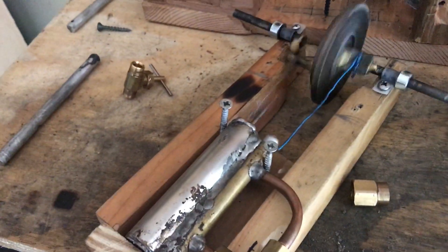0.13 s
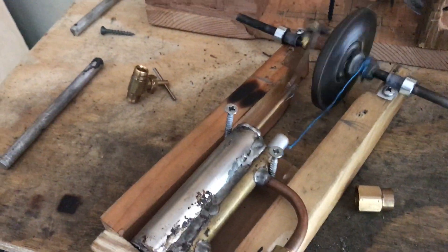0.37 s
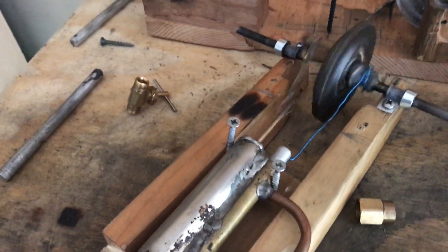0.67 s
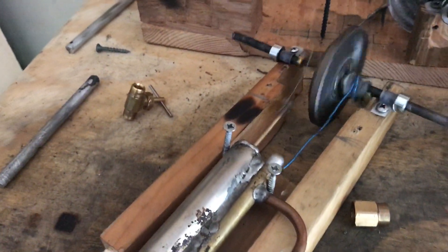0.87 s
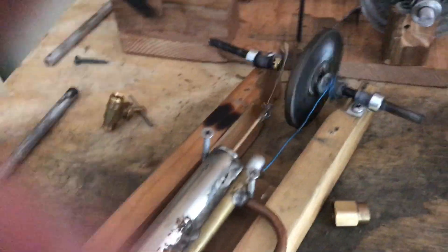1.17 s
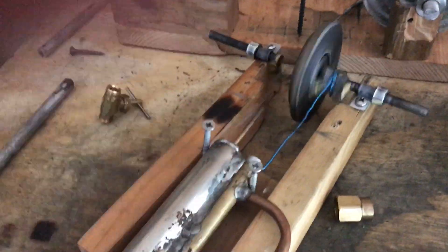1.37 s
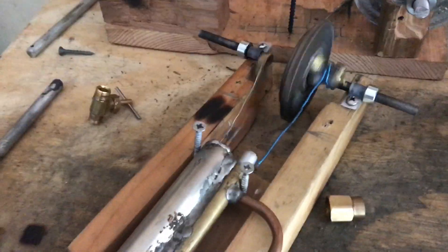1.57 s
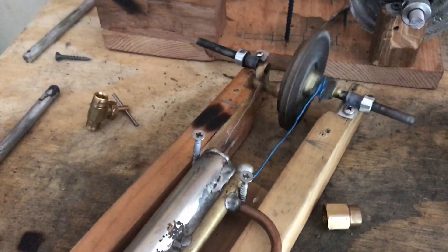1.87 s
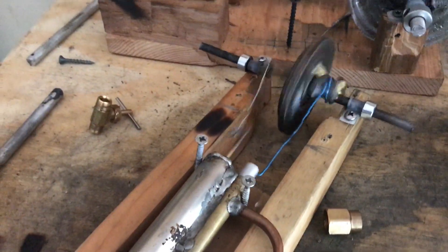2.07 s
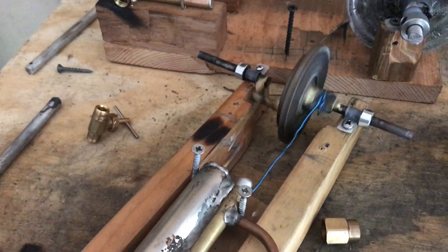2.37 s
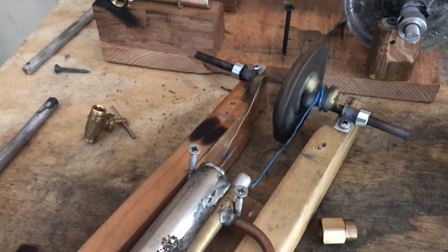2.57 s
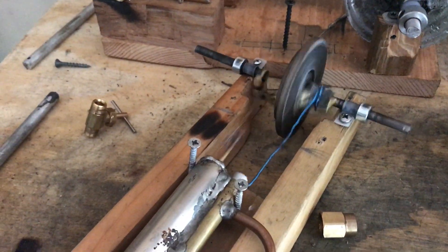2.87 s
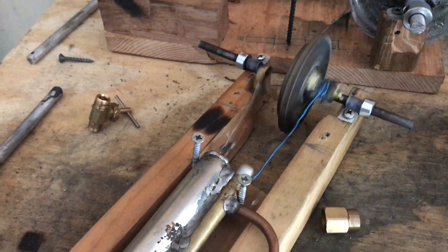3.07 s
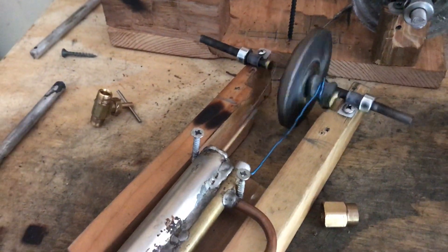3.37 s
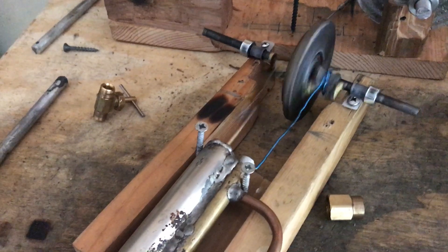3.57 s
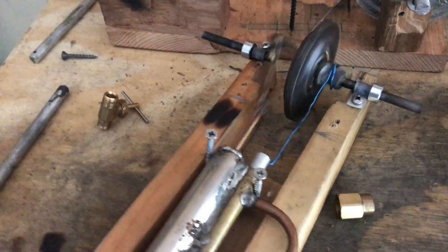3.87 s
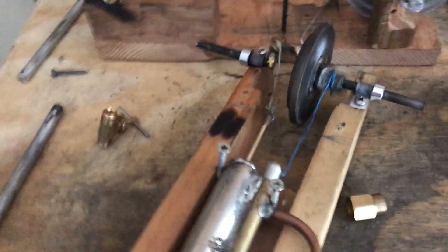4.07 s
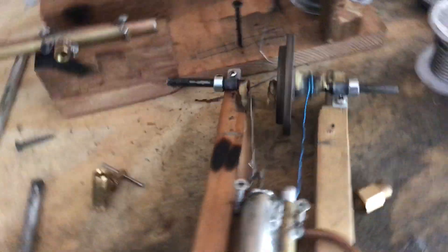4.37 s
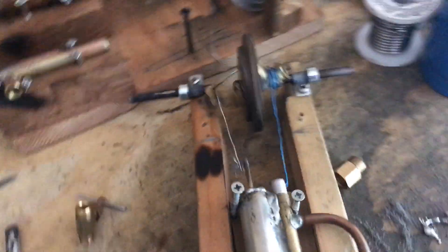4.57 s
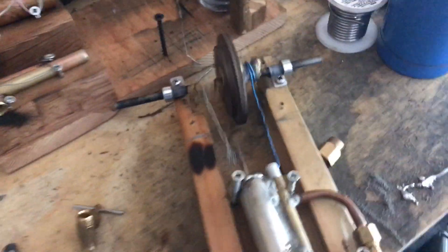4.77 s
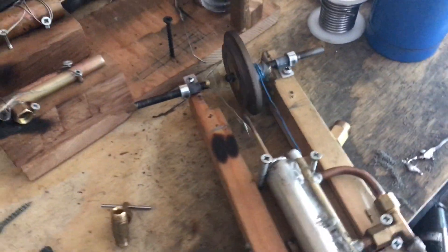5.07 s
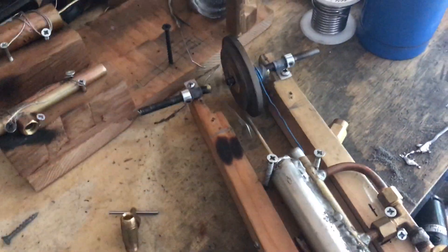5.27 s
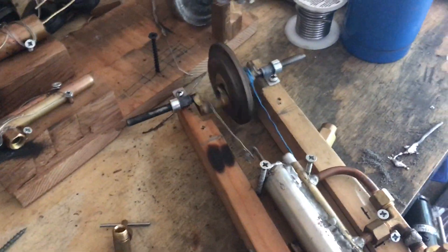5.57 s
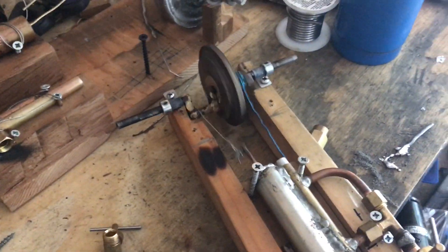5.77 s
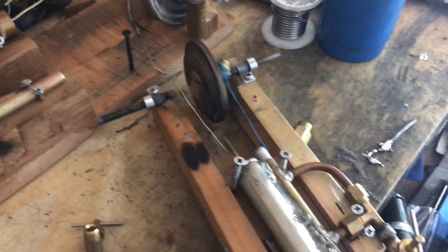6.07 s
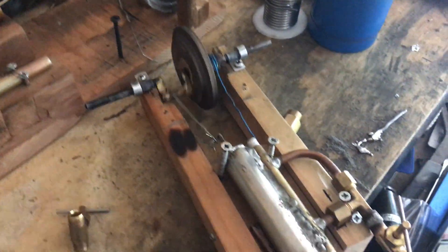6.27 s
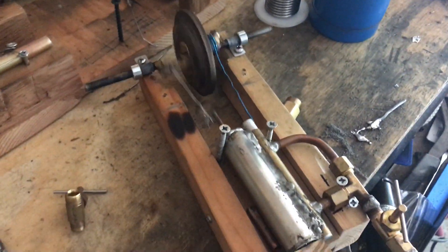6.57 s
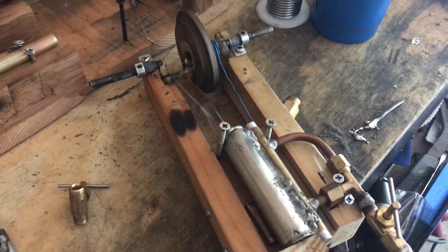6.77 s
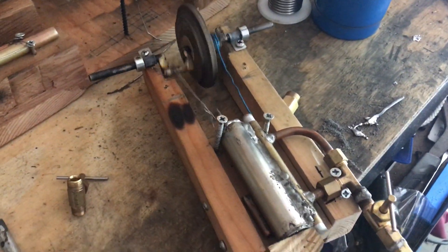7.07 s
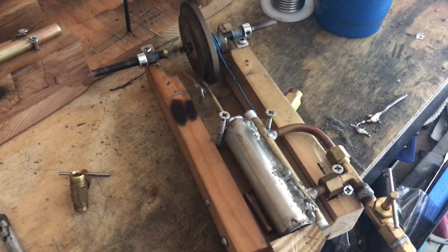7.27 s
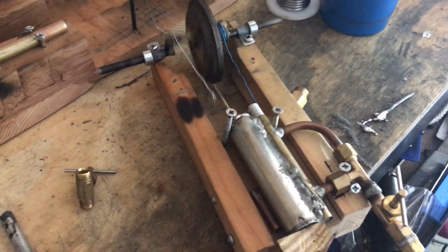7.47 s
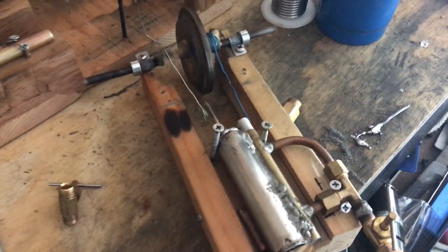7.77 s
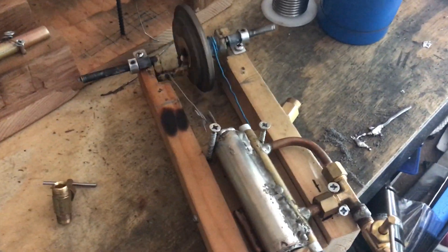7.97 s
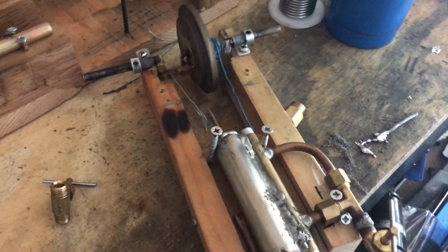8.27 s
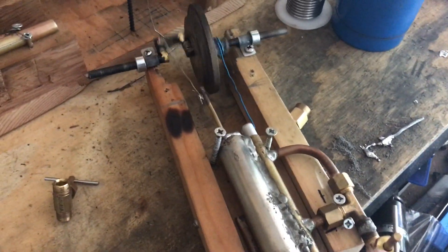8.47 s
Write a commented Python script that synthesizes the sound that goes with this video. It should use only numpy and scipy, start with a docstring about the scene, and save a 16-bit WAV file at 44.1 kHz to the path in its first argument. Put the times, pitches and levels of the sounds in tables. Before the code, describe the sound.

A small model engine is already running at 0 s, close to a handheld mono phone in a quiet workshop. Bright, noisy hissing puffs come about twelve to thirteen a second, strong and weak in turn, blending into a fluttering chuff over a constant thin leak. Irregular metallic knocks from slack links and a fine loose rattle sit under the hiss, with a short woody ring; a stronger knock falls near 0.7 s. The hiss shifts colour briefly around 1.3 s. From about 2.5 s the pace eases, to some eleven a second by 4 s. Around 4.3 s the phone swings round and the tone changes again, with a slight low rumble. From 5 s the engine slows clearly, weak puffs becoming much fainter. After 6 s tiny high flywheel pings appear. Near 7.9 s low hum swells briefly; puffs continue at about six a second until the end at 8.6 s.

```python
"""A small double-acting model engine puffs on a wooden frame on a workbench, close to a hand-held mono phone.
Its valve lets out hissing noise, a strong and a weak puff each turn, over a constant leak.
Slack links knock at the stroke ends and ring the frame and flywheel, over a quiet room and a low hum.
The phone swings round, which moves the dips that the bench echo cuts into the hiss."""
import sys
import numpy as np
from scipy import signal
from scipy.fft import rfft, irfft
from scipy.io import wavfile
from scipy.ndimage import uniform_filter1d

SR = 44100
rng = np.random.default_rng(int(sys.argv[2]) if len(sys.argv) > 2 else 0)


def to_wav(sig):
    """Store sig (one row per channel, or 1-D mono) as 16-bit WAV at the path in sys.argv[1].

    Samples outside -1..1 are clipped; the rate is SR.
    """
    pcm = np.clip(np.atleast_2d(sig), -1, 1) * 32767
    pcm = np.round(pcm).astype(np.int16)
    wavfile.write(sys.argv[1], SR, pcm.T)  # frames by channels


N = 380583
T = np.arange(N) / SR  # time of every sample [s]
HZ = np.fft.rfftfreq(N, 1 / SR)  # frequency of every spectrum bin [Hz]

# exhaust puffs, strong and weak side in turn: (valve opens [s], basic level [dB])
PUFFS = [(-0.03, -21), (0.051, -24.5), (0.125, -21.5), (0.205, -22.5), (0.286, -21.5), (0.369, -21),
         (0.446, -21.5), (0.521, -25), (0.604, -20.5), (0.685, -22), (0.76, -21.5), (0.839, -25),
         (0.917, -21.5), (0.992, -24.5), (1.077, -20.5), (1.151, -24.5), (1.223, -20), (1.315, -25.1),
         (1.389, -20), (1.466, -22.5), (1.543, -21), (1.618, -24), (1.691, -21), (1.776, -24.5),
         (1.861, -21), (1.941, -23.5), (2.019, -20.5), (2.097, -26.5), (2.181, -21), (2.264, -25),
         (2.347, -22.5), (2.432, -25.5), (2.523, -21.5), (2.608, -24), (2.698, -22), (2.783, -24),
         (2.867, -22), (2.949, -26), (3.039, -22), (3.129, -23), (3.212, -23), (3.298, -26), (3.39, -22),
         (3.476, -24.5), (3.574, -22.3), (3.665, -25.5), (3.758, -21.5), (3.849, -26.5), (3.946, -21.5),
         (4.041, -24), (4.133, -23), (4.224, -27.5), (4.324, -21.5), (4.426, -25.5), (4.517, -21),
         (4.608, -29.5), (4.703, -22), (4.798, -27.5), (4.895, -21.5), (4.997, -25.8), (5.093, -23),
         (5.188, -28), (5.287, -23.5), (5.39, -29), (5.495, -24), (5.6, -30), (5.717, -23), (5.829, -30),
         (5.951, -23.5), (6.066, -29.5), (6.187, -24.5), (6.311, -29), (6.442, -23), (6.569, -29),
         (6.697, -23.5), (6.823, -29.5), (6.967, -23), (7.102, -31), (7.242, -24.5), (7.388, -30.5),
         (7.548, -23.5), (7.694, -30), (7.866, -23.5), (8.016, -28), (8.182, -23.5), (8.326, -29),
         (8.486, -23)]


def exhaust(swing, leak_db, lift_db):
    """Both ends of the cylinder puff in turn through the valve; the glands leak all the time."""
    strong_flow = valve(PUFFS[::2], turn_share=0.26, extra_s=0.0055, colour_columns=(1, 2),
                        sag_db=[2.8, 1.3, 1.3], burst_db=[3.2, 2.2, 2.2], early_db=-13, shut=0.0065)
    strong = strong_flow * jet(column=1, swing=swing, lift_db=lift_db, flicker_db=1.05)

    weak_flow = valve(PUFFS[1::2], turn_share=0.33, extra_s=-0.009, colour_columns=(3, 4),
                      sag_db=[2.8, 1.8, 1.8], burst_db=[3.2, 2.4, 2.4], early_db=-17, shut=0.0045)
    weak = weak_flow * jet(column=2, swing=swing, lift_db=lift_db, flicker_db=0.7)

    leak_flow = undb(leak_db + 0.52 * walk(6.5))
    leak = leak_flow * jet(column=3, swing=swing, lift_db=0.51 * lift_db, flicker_db=0.25)
    return patchy((strong + weak + leak).sum(axis=0), spread_db=1.08, rate=35)


def valve(rows, turn_share, extra_s, colour_columns, sag_db, burst_db, early_db, shut):
    """Flow through the port for three parts: it snaps open, swells to a burst, sags with the pressure, shuts."""
    # low and high part of the puffs against their middle, before the scatter:
    # (time [s], strong low [dB], strong high [dB], weak low [dB], weak high [dB])
    puff_colour = [(0, 0, 3.5, 0, 0.7), (1.2, 0, 0.5, 3.5, 2.2), (2, -1, 2, 2, 4), (3, 0.7, 4, 1, 2.5),
                   (4.1, 0, 3.5, 0.5, 3.5), (4.4, -0.5, 0, 4, 4.5), (4.8, 2, 1.5, 2.2, 3),
                   (6, 4, 5, 0, 2.5), (7.3, -0.1, 1.5, 0, 3), (8.63, 1, 1.5, -1.5, 2.7)]
    open_s, early_s, early_open_s = 0.0018, 0.0099, 0.0082  # the port cracks open before it gapes
    burst_fade = 0.37  # a slower engine puffs flatter: power of the speed
    shut_power = 0.23  # and takes little longer to shut: power of the turn time
    colour_scatter_db = 0.68  # from puff to puff

    flow = np.zeros((3, N))
    opens = np.array(rows)[:, 0]
    turns = np.gradient(opens)  # seconds per turn of the crank
    # the slack links open the valve early or late; the evenly turning crank shuts it
    even = signal.savgol_filter(opens, 7, 3)
    shuts = even + turn_share * np.gradient(even) + extra_s
    lengths = shuts - opens

    tint = np.array(puff_colour)
    tints = np.transpose([np.interp(opens, tint[:, 0], tint[:, c]) for c in colour_columns])
    tints = tints + colour_scatter_db * rng.standard_normal(tints.shape)

    for (start, db), length, turn, (low_db, high_db) in zip(rows, lengths, turns, tints):
        first = max(int((start - 0.04) * SR), 0)
        span = slice(first, int((start + length + 0.06) * SR))
        t = T[span] - start
        gate = 1 / (1 + np.exp(-t / open_s))
        # at speed the valve leads more
        lead_db = early_db - 30 * (turn - 0.1651)
        crack = undb(lead_db) / (1 + np.exp(-(t + early_s) / early_open_s))
        gate = gate + (1 - gate) * crack
        gate = gate / (1 + np.exp((t - length) / (shut * turn ** shut_power)))

        crank = t / turn  # turns since opening
        burst_width = np.where(crank < 0.075, 0.06, 0.09)
        burst = (0.15 / turn) ** burst_fade * np.exp(-((crank - 0.075) / burst_width) ** 2)
        sag = np.clip(crank, 0, 0.3) / 0.97 - 0.4
        for part, offset_db in enumerate((low_db, 0, high_db)):
            fall_db = sag_db[part] * sag - burst_db[part] * burst
            flow[part, span] += gate * undb(db + offset_db - fall_db)
    return flow


def jet(column, swing, lift_db, flicker_db):
    """Turbulent hiss as low, middle and high part; each part flickers on its own."""
    # hiss colour from each viewpoint: (frequency [Hz], strong puff [dB], weak puff [dB], leak [dB])
    first_view = [(149, -21, -23, -4), (492, -20.5, -13, -16), (846, -8, -3, -5.5), (1430, -5.5, -2, -4.5),
                  (2060, -3, -0.5, -2), (3400, -1.5, 3, -2.5), (3980, 0.5, -2.5, -3), (4900, 1, -2, 0),
                  (5770, 4.5, -0.5, 0.5), (6900, -1, -0.5, -2.5), (8180, -1, -2.5, -3.5),
                  (10400, -10, -0.5, -4), (12200, -7.5, -4.5, -3.5), (15000, -0.5, 5, 1.5),
                  (17000, -16, -9.5, -3)]
    second_view = [(150, -26.5, -14, -13), (510, -20.5, -14.5, -15), (850, -10.5, -5.5, -8),
                   (1360, -16.5, -12.5, -14), (1750, -13.5, -8, -11.5), (2790, -1, 0, -0.5),
                   (4110, 4, 0, -1), (5570, -3, -0.5, -1.5), (6650, -1, -1, -1), (7670, -3.5, -2.5, 0.5),
                   (8650, 0, 0.5, -0.5), (10100, -3.5, -1.5, -1), (11200, 0.5, 0, 1), (15000, 1.5, 2, 4.5),
                   (17000, -12.5, -5.5, 0.5)]
    # narrow dips where an echo off the bench cancels the hiss, and peaks where the pipe rings:
    # (frequency [Hz], width [Hz], level [dB])
    first_dips = [(1446, 52, 6), (5860, 150, 0.5), (10370, 160, -4.5)]
    second_dips = [(1320, 130, 9.5), (4380, 290, 3), (7660, 180, -6.5), (10460, 180, -3)]
    # the deepest dip of the first viewpoint, early row and late row: (frequency [Hz], width [Hz], level [dB])
    sliding_dip = [(5000, 270, -12), (4670, 290, -9.5)]
    # that dip slides down as the hand drifts: (time [s], share of the late dip [0-1])
    slide_path = [(1.2, 0.2), (2.1, 1), (4.2, 0.9)]
    low_hz, high_hz = 2200, 9000  # where the three parts meet

    noise = rng.standard_normal(N)

    def seen_from(view, dips):
        view = np.array(view)
        return colour(noise, view[:, 0], view[:, column], dips)

    early = seen_from(first_view, first_dips + sliding_dip[:1])
    late = seen_from(first_view, first_dips + sliding_dip[1:])
    second = seen_from(second_view, second_dips)
    slide = np.clip(curve(slide_path)[0], 0, 1)
    first = (1 - slide) * early + slide * late
    hiss = (1 - swing) * first + swing * second

    near_4khz = irfft(rfft(hiss) * np.exp(-((HZ - 4050) / 600) ** 2), N)
    hiss = hiss + (undb(lift_db) - 1) * near_4khz

    bins = rfft(hiss)
    low = 1 / (1 + (HZ / low_hz) ** 4)
    high = 1 / (1 + (high_hz / (HZ + 1)) ** 6)
    middle = 1 - low - high
    return np.array([irfft(bins * part, N) * undb(flicker_db * walk(220)) for part in (low, middle, high)])


def patchy(x, spread_db, rate):
    """Eddies move the colour about: bands spaced 1.2 kHz apart drift in level, each on its own."""
    bins, out = rfft(x), 0
    for hz in range(0, 18000, 1200):
        band = np.clip(1 - abs(HZ - hz) / 1200, 0, 1)
        out = out + irfft(bins * band, N) * undb(spread_db * walk(rate))
    return out


def linkage():
    """Knocks and loose rattle ring links and flywheel; the bearings shake the wood all the time."""
    # links taking up their slack, the loud blows: (time [s], blow level before ringing [dB])
    loud_knocks = [(0.2254, -21), (0.2992, -22), (0.374, -22), (0.6917, -17.5), (1.012, -26), (1.0854, -26),
                   (1.1603, -29), (1.2354, -22), (1.705, -24), (1.8687, -21.5), (1.949, -24), (2.6405, -21),
                   (2.801, -21.5), (2.8787, -28), (3.1336, -23), (3.2243, -25), (4.0744, -21), (4.143, -21),
                   (4.4303, -24), (4.5232, -27), (5.027, -25), (5.1002, -22), (5.294, -28), (5.72, -29),
                   (6.1519, -31), (6.1922, -37), (6.97, -30), (7.2454, -27), (7.4058, -31), (7.5506, -28),
                   (7.8241, -32), (7.8658, -32), (7.887, -31), (8.1828, -31), (8.2, -28), (8.467, -36),
                   (8.489, -29)]
    # taps on the flywheel: (time [s], blow level before ringing [dB])
    pings = [(5.9524, -28), (6.1554, -39), (6.1903, -30), (6.9306, -44), (6.962, -36), (7.222, -35),
             (7.5153, -37), (7.5512, -33), (7.8376, -38), (8.1579, -34), (8.4667, -34), (8.4881, -32)]
    # ringing of links, of flywheel, of frame and bench: (frequency [Hz], strength [dB], 60 dB decay [s])
    link_modes = [(841.4, -17, 0.11), (1341, -7, 0.059), (1381, -7, 0.07), (1426, -24, 0.059)]
    flywheel_modes = [(3502, 7.5, 0.056)]
    wood_modes = [(266.6, -1, 0.16), (322, -2.5, 0.086), (352.6, -1.5, 0.084), (398, -16, 0.082)]
    # shaking of the wood by the bearings, before the bass cut: (time [s], level [dB])
    shake_level = [(0, -49), (1.6, -48), (2.2, -51.5), (4.0, -52.5), (4.5, -49), (5.4, -53.5), (8.63, -55)]

    knocks = blows(loud_knocks) + blows(soft_knocks())

    # the links hang slack between the weak puff and the next strong one
    strong_opens = np.array(PUFFS)[::2, 0]
    latest = np.clip(np.searchsorted(strong_opens, T + 0.045) - 1, 0, None)
    since = T - strong_opens[latest]
    slack = 0.59 + np.exp(-((since + 0.022) / 0.021) ** 2)
    ticks = (rng.random(N) < 250 / SR) * rng.standard_normal(N)  # about 250 a second
    rattle = ticks * slack * undb(-45.5 + 2.7 * walk(25))

    rubbing = rng.standard_normal(N) * undb(3.0 * walk(20))
    shake = unit(ring(rubbing, wood_modes)) * undb(curve(shake_level)[0])

    links = ring(knocks + rattle, link_modes)
    flywheel = ring(blows(pings) + 0.27 * rattle, flywheel_modes)
    wood = shake + ring(0.11 * knocks, wood_modes)
    # links, flywheel and wood give no deep bass
    bass_cut = signal.butter(4, 225, "high", fs=SR, output="sos")
    return signal.sosfilt(bass_cut, links + flywheel + wood)


def soft_knocks():
    """One soft blow follows each opening of the valve after the first, harder at speed."""
    usual_lag_s = 0.006
    slow_db, db_per_hz, scatter_db = -48, 2.6, 2  # level at standstill, rise with turns a second, scatter
    opens = np.array(PUFFS)[1:, 0]
    chance = rng.standard_normal((len(opens), 2)).T
    turns_hz = 0.5 / np.gradient(opens)  # two puffs a turn
    db = slow_db + db_per_hz * turns_hz + scatter_db * chance[0]
    times = opens + usual_lag_s * (1 + 0.5 * chance[1])
    return np.transpose([times, db])


def blows(rows):
    """Each row strikes one blow, then a smaller bounce 3 to 9 ms later."""
    out = np.zeros(N)
    for (s, db), (lag, size) in zip(rows, rng.random((len(rows), 2))):
        out[int(s * SR)] += undb(db)
        out[int((s + 0.003 + 0.006 * lag) * SR)] += size * undb(db)
    return out


def ring(x, modes):
    """Blows set off decaying tones, one for each way the part can vibrate."""
    out = 0
    for hz, db, t60 in modes:
        pole = np.exp(2j * np.pi * hz / SR - np.log(1000) / (t60 * SR))
        out = out + undb(db) * signal.lfilter([1], [1, -pole], x).imag
    return out


def workshop():
    """Quiet room tone is shaped noise; a low hum is noise ringing one deep tone."""
    # colour of the room tone: (frequency [Hz], relative level [dB per Hz])
    room = [(30, -14), (55, 5.5), (80, -2.5), (130, -1.5), (190, -21), (300, -5.5), (480, -19),
            (900, -15.5)]
    # low hum that comes and goes: (time [s], level [dB])
    rumble = [(0, -69), (3.9, -72), (4.2, -56), (4.7, -66), (7.75, -70), (7.9, -49), (8.2, -61),
              (8.63, -62)]
    tone = undb(-49.5 + 1.6 * walk(2.95)) * colour(rng.standard_normal(N), *np.transpose(room))
    hum = unit(ring(rng.standard_normal(N), [(54, 0, 0.43)]))  # (Hz, dB, 60 dB decay in s)
    return tone + undb(curve(rumble)[0]) * hum


def colour(x, hz, db, dips=()):
    """Noise shaped by (Hz, dB) points and narrow dips or peaks, brought to rms 1."""
    shape_db = np.interp(np.log(HZ + 1), np.log(hz), db)
    for dip_hz, width, dip_db in dips:
        shape_db = shape_db + dip_db / (1 + ((HZ - dip_hz) / width) ** 2)
    return unit(irfft(rfft(x) * undb(shape_db), N))


def walk(rate):
    """Random wandering around 0 with spread about 1: new levels rate times a second, smoothed twice."""
    hold = max(int(SR / rate), 1)
    steps = np.repeat(rng.standard_normal(N // hold + 1), hold)
    smooth = uniform_filter1d(uniform_filter1d(steps, hold), hold)
    return unit(smooth[:N])


def curve(table):
    """The columns after the time column, read off at every sample."""
    s, *columns = np.transpose(table)
    return [np.interp(T, s, c) for c in columns]


def undb(db):
    """Turn decibels into a plain factor."""
    return 10 ** (np.asarray(db) / 20)


def unit(x):
    """Scale a signal to rms 1."""
    return x / np.sqrt(np.mean(x ** 2))


def scene():
    """Engine and workshop add up to one mono sound, put on two equal channels."""
    # the phone swings round; the leak later gets about half the lift:
    # (time [s], share of the second viewpoint [0-1], leak level [dB], puff lift near 4 kHz [dB])
    swing_path = [(0, 0.04, -30.5, 2.5), (1.1, 0.16, -30.5, 4.5), (1.25, 0.56, -29, 4),
                  (1.45, 0.4, -31.5, 4.5), (1.6, 0.37, -30, -2), (3.0, 0.06, -31, 1), (4.2, 0.13, -31.5, 0),
                  (4.33, 0.77, -30, 4), (4.7, 0.88, -32, 1.5), (8.63, 0.91, -31.5, -0.5)]
    swing, leak_db, lift_db = curve(swing_path)
    mono = exhaust(np.clip(swing, 0, 1), leak_db, lift_db) + linkage() + workshop()
    return np.array([mono, mono])


def record(dry):
    """The phone drops the deepest bass and cuts the top."""
    bass_cut = signal.butter(3, 42, "high", fs=SR, output="sos")
    top_cut = signal.ellip(14, 0.3, 80, 15720, fs=SR, output="sos")
    return signal.sosfilt(top_cut, signal.sosfilt(bass_cut, dry))


dry = scene()
out = record(dry)
to_wav(out)
```